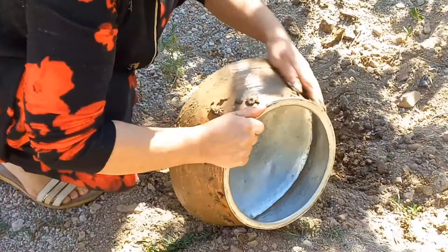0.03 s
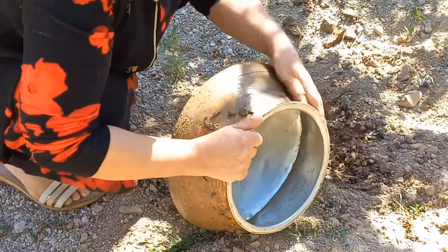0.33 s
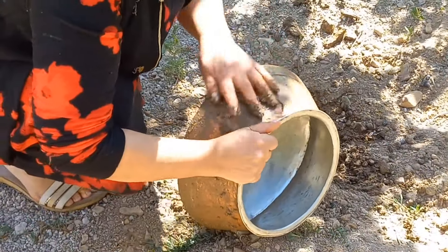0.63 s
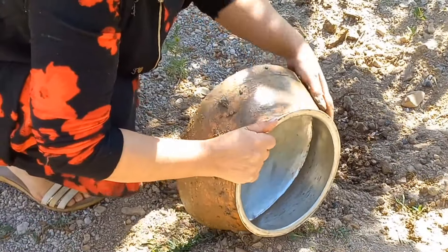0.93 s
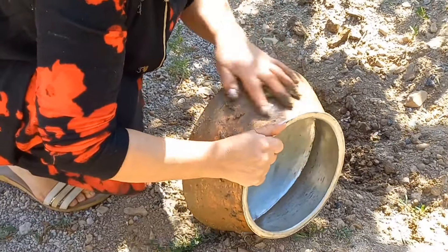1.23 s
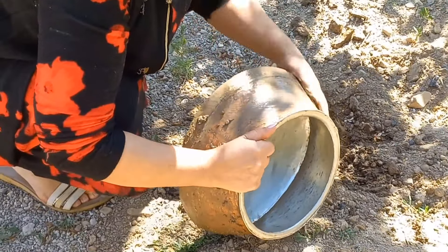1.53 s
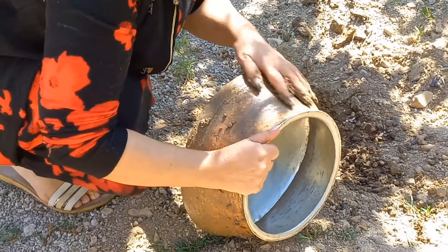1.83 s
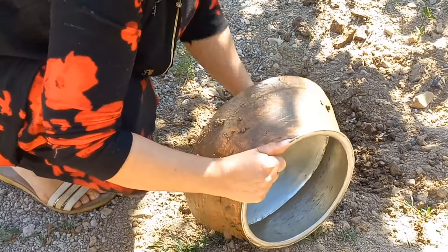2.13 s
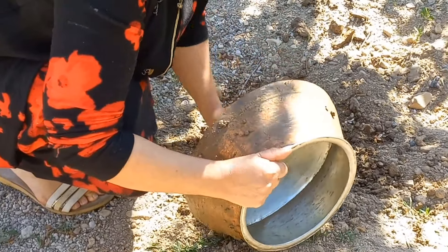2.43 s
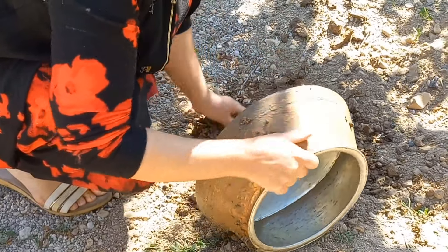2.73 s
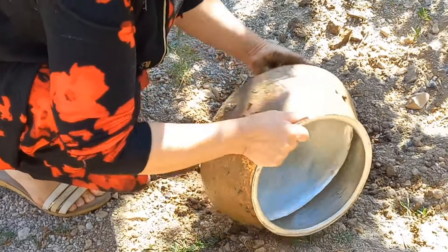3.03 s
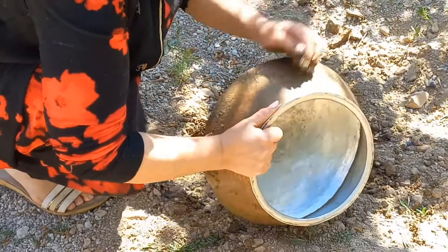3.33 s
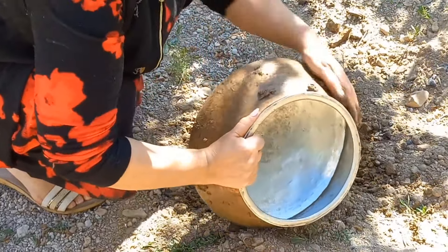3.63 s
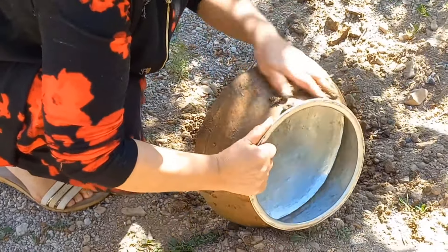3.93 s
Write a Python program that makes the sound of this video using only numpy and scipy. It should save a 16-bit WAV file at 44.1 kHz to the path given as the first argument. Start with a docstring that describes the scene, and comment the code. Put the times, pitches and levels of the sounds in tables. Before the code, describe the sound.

A hand scrubs a metal pot with dry soil in gritty, faintly ringing strokes.

```python
"""A hand scours the outside of a metal pot with dry soil, outdoors, in back-and-forth strokes.
Stick-slip friction of the grit makes a dense train of impulses, heard directly as a hiss and
through the wall's modes as a ring. Halfway the hand scoops fresh soil from the ground, then scrubs
on. Puffs of breeze thud and rumble on the close microphone, over a faint hush and two far chirps."""
import sys
import numpy as np
from scipy import signal
from scipy.io import wavfile

SR = 44100
rng = np.random.default_rng(int(sys.argv[2]) if len(sys.argv) > 2 else 0)


def master_out(mix):
    """Clip the mix to full scale and print it as 16-bit PCM to the path in sys.argv[1]."""
    frames = np.transpose(np.atleast_2d(mix))
    ceiling = np.clip(frames, -1, 1)
    pcm = np.round(ceiling * 32767).astype(np.int16)
    wavfile.write(sys.argv[1], SR, pcm)


N = 176400
T = np.arange(N) / SR

# relative spectral density of the outdoor hush: frequency_hz, level_db
AIR_SPECTRUM = [(30, -14.5), (150, 6.5), (500, -0.5), (1500, -8), (4000, -9), (7500, -8.5), (10000, -20),
                (15000, -13)]
# relative spectral density of the wind rumble: frequency_hz, level_db
RUMBLE_SPECTRUM = [(25, -22), (55, 3.5), (95, 6), (170, -5), (280, -11.5), (500, -40.5), (900, -50)]
# envelope of the rumble: time_s, level_db
RUMBLE_ENVELOPE = [(0, -48.5), (.14, -64), (.22, -71.5), (.55, -67), (.65, -49), (.78, -77.5),
                   (2.05, -87.5), (2.28, -55.5), (2.55, -64), (2.75, -56.5), (2.86, -46), (3.1, -55),
                   (3.28, -56.5), (3.5, -52), (3.75, -46.5), (4, -44.5)]
# distant chirps: start_s, length_s, level_db
FAR_CHIRPS = [(2.56, 0.074, -74), (2.736, .12, -75)]
# breeze striking the microphone: start_s, peak_db, pitch_hz, relative_puff_db, left_minus_right_db
WIND_THUDS = [(.005, -49, 112, -19, 1), (0.061, -52, 235, -9, -2), (0.094, -44.5, 265, -10.5, -2),
              (0.136, -47, 243, -5, -2), (0.432, -43, 79, -25, -2), (0.593, -46.5, 122, -18, -27),
              (0.624, -44, 74.6, -28, -8), (0.66, -68, 137, -18, -9), (1.161, -53, 87, -16, 4),
              (2.141, -47, 89, -24, 3), (2.297, -40.5, 80, -23, -6), (2.321, -45, 110, -25, 1),
              (2.624, -44, 97, -46, -3), (2.68, -41, 104, -31, -24.5), (2.763, -53, 258, -3, 3),
              (2.788, -40, 214, -11, -10), (2.808, -39.5, 182, -8.5, -11), (2.838, -26, 180, -15.5, -1.5),
              (2.848, -23.5, 101.6, -15, 0), (2.921, -41, 113, -28, 16), (3.003, -36, 95, -26, 0),
              (3.207, -42.5, 111, -34, -13), (3.332, -37, 84.6, -40, -3.5), (3.357, -36.5, 75.4, -20.5, -2),
              (3.532, -36.5, 105, -33, -1), (3.552, -38.5, 109, -25, -7), (3.626, -37, 119, -20, -27),
              (3.66, -34, 140, -18.5, -3), (3.724, -30.5, 160, -9.5, -9), (3.748, -42.5, 162, -2, 3),
              (3.808, -30.5, 97, -11, -1), (3.892, -36, 127, -10, -13), (3.916, -36.5, 105, -15.5, -8),
              (3.947, -24, 112, -20.5, -2.5)]

# sweeps through loose soil: start_s, end_s, rise_s, fall_s, level_db, swell_db, treble_db
SOIL_SWEEPS = [(2.20, 2.79, 0.22, 0.4, -67.5, 9, 0.5), (2.49, 2.58, 0.019, 0.065, -63, -2, -7.5),
               (2.81, 2.9, 0.044, 0.045, -62.5, 9, -5.5), (2.87, 3.06, 0.059, 0.055, -71, 9, -1),
               (2.98, 3.19, 0.11, 0.17, -57, -6, -4.5)]
# relative spectral density of raked soil: frequency_hz, level_db
SOIL_SPECTRUM = [(300, -14), (800, -29), (1300, -5.5), (2000, 1.5), (2800, -3), (4000, 5), (6000, -2.5),
                 (7400, -5.5), (9000, -6.5), (15000, -8)]
# clods crumbling: start_s, peak_db, t60_s
CLOD_BREAKS = [(2.142, -55, 0.051), (2.188, -56.5, 0.2), (2.486, -55, 0.11), (2.501, -62, 0.089)]
# gathering the handful: start_s, end_s, rise_s, fall_s, level_db, swell_db
GATHER_STROKES = [(2.93, 3.26, 0.18, 0.27, -66, -8)]
# resonances of the cupped handful: pitch_hz, level_db, t60_s
HOLLOW_MODES = [(1250, -7, 0.042), (1850, 3, 0.019), (3800, -19.5, 0.014)]

# strokes on the pot: start_s, end_s, rise_s, fall_s, level_db, swell_db, treble_db, ring_db
POT_STROKES = [(-.06, .07, .04, 0.063, -33.5, -4, -2.5, -6.5), (.02, .27, 0.048, 0.17, -35.5, 9.5, 2, -1),
               (.24, .62, 0.057, 0.044, -44.5, -4, 3.5, 1.5), (.56, .715, 0.043, 0.092, -39.5, -5, 1.5, -2),
               (.595, .66, 0.035, 0.022, -38.5, 2, -4, 0), (.70, .87, 0.058, 0.078, -33, 6.5, 0, -5),
               (.79, 1.02, 0.052, .13, -34, -1.5, -1, -2.5),
               (1.01, 1.24, 0.072, 0.022, -43, -3.5, 2.5, 1.5),
               (1.18, 1.40, 0.031, 0.092, -38, 7, -1, -7.5), (1.385, 1.51, 0.033, 0.08, -45.5, 13, 9, 4),
               (1.49, 1.68, 0.085, 0.096, -37.5, -9, 0.5, -8.5),
               (1.665, 2.04, 0.078, 0.091, -41.5, -3, 2.5, -3.5),
               (1.96, 2.10, 0.021, 0.13, -53, -3, 22, 14.5),
               (2.03, 2.32, 0.036, 0.069, -66.5, -5.5, 5.5, 5.5),
               (3.345, 3.42, .025, 0.037, -70, 10.5, 14.5, 11.5),
               (3.41, 3.555, 0.097, 0.092, -44.5, -6.5, 4, 3), (3.55, 3.85, 0.16, 0.11, -35, -4.5, 2, 3),
               (3.82, 4.08, 0.077, .06, -38.5, 0, 0.5, 1.5)]
# light contact through the turns: start_s, end_s, rise_s, fall_s, level_db, swell_db, treble_db, ring_db
PALM_CONTACTS = [(-.1, 2.1, .05, .08, -55, -1.5, 3.5, -1), (3.49, 4.5, 0.13, .05, -54.5, 2.5, 6, 12)]
# packed grit juddering: centre_s, half_length_s, level_db, pitch_hz
GRIT_JUDDERS = [(0.166, .03, -42, 2140), (0.573, 0.014, -44, 3000), (0.619, 0.015, -37.5, 2380),
                (0.843, 0.016, -44, 2200), (0.87, .03, -40.5, 2950), (1.313, 0.035, -44, 2940),
                (1.565, 0.022, -49, 2370)]
# relative spectral density of grit under the palm: frequency_hz, level_db
GRIT_SPECTRUM = [(300, -26.5), (620, -24.5), (900, -26.5), (1120, -32), (1400, -5.5), (1750, -5),
                 (2250, 3.5), (3200, 2), (4500, 1), (6000, -5), (8500, -14), (11500, -10.5), (15500, -13)]
# stereo width of the scraping: frequency_hz, side_minus_mid_db
SCRAPE_WIDTH = [(300, -4), (1000, -13), (2200, -12.5), (4500, -8), (8000, -7.5), (12000, -7)]
# wall modes, damped by the hands: pitch_hz, level_db, t60_s
WALL_MODES = [(775, -31.5, 0.084), (974, -25, 0.15), (1120, -42, 0.082), (1216.5, -19, 0.063),
              (1318, -23.5, 0.27), (1367, -22, 0.13), (1478, -20.5, 0.18), (1703, -18.5, 0.03),
              (1846, -20, 0.14), (2465, -50, 0.14), (2980, -26.5, 0.15), (3570, -21.5, 0.027),
              (3900, -19, 0.055), (4630, -22.5, 0.085)]

AIR_DB, AIR_SIDE_DB, RUMBLE_SIDE_DB, RUMBLE_PAN_DB = -73, -1.5, -2, -5.5
CHIRP_FROM_HZ, CHIRP_TO_HZ, CHIRP_ROUGH_HZ = 4300, 3600, 90
THUD_RISE_S, PUFF_LOW_HZ, PUFF_HIGH_HZ, PORT_LAG_RAD = 0.0089, 157, 389, 1.6
GRIT_DB, GRAINS_PER_S, GRAIN_SPREAD_DB, JUDDER_T60_S = -2, 14000, 1.5, 0.011
CATCH_DB, CATCH_HZ, PRESSURE_DB, PRESSURE_HZ, PATCHY_DB = 1.23, 135, 0.4, 19, 2
SPEED_EXPONENT = 1.72
TREBLE_FROM_HZ, TREBLE_FULL_HZ = 2550, 7700
ECHO_DELAY_S, ECHO_SWING, ECHO_DRIFT_HZ, ECHO_DB = .0021, 0.119, 1.42, -6
MODE_WANDER_DB, RING_SIDE_DB = 5, -12.5
SHIMMER_DB, SHIMMER_T60_S, SHIMMER_LOW_HZ, SHIMMER_HIGH_HZ = -9, 0.065, 1895, 5094
CUTOFF_HZ = 15850


def from_db(db):
    """Decibels to amplitude ratio."""
    return 10 ** (np.asarray(db) / 20)


def unit_rms(x):
    """Normalisation to unit mean power."""
    return x / np.sqrt(np.mean(x ** 2) + 1e-20)


def at_hz(points, hz):
    """Interpolation along a logarithmic frequency axis."""
    frequencies, levels = np.transpose(points)
    return np.interp(np.log(hz), np.log(frequencies), levels)


def drift(hz):
    """Low-passed Gaussian noise: a smooth random fluctuation of unit spread."""
    pole = np.exp(-40 * np.pi * hz / SR)   # runs at SR / 20
    slow = signal.lfilter([1], [1, -2 * pole, pole * pole], rng.standard_normal(N // 20 + 2002))[2000:]
    return np.interp(np.arange(N) / 20, np.arange(len(slow)), unit_rms(slow))


def band(x, low_hz, high_hz):
    """Maximally flat band-pass filtering."""
    return signal.sosfilt(signal.butter(2, [low_hz, high_hz], "band", fs=SR, output="sos"), x + 1e-18)


def resonator(x, hz, t60):
    """A damped harmonic oscillator with unit gain at resonance."""
    r = np.exp(-np.log(1000) / (t60 * SR))
    return signal.lfilter([1 - r, 0, r - 1], [1, -2 * r * np.cos(2 * np.pi * hz / SR), r * r], x + 1e-18)


def stereo(pair, side_db):
    """Sum and difference turn mid and side into left and right, conserving power."""
    side = from_db(side_db)
    return np.array([pair[0] + side * pair[1], pair[0] - side * pair[1]]) / np.sqrt(1 + side ** 2)


def pan(db):
    """A left-right level difference at constant power."""
    return unit_rms(from_db([[db / 2], [-db / 2]]))


def coloured(sources, spectrum, width, patchy_db, treble_db=0):
    """Spectral shaping in independently flickering third octaves; power near 1 before the treble tilt."""
    edges = 20 * 2 ** (np.arange(30) / 3)
    out, power = 0, 0
    for k, (low, high) in enumerate(zip(edges, edges[1:])):
        hz = np.sqrt(low * high)
        if high < spectrum[0][0] or low > spectrum[-1][0]:
            continue
        part = stereo(band(sources[k % 2], low, high), at_hz(width, hz))   # neighbours are uncorrelated
        part *= from_db(at_hz(spectrum, hz) + patchy_db * drift(PRESSURE_HZ))
        power += np.mean(part ** 2)
        tilt = np.clip(np.log(hz / TREBLE_FROM_HZ) / np.log(TREBLE_FULL_HZ / TREBLE_FROM_HZ), 0, 1)
        out += part * from_db(treble_db * tilt)
    return out / np.sqrt(power)


def air():
    """Turbulent pressure at the microphone rumbles over a faint broadband hush."""
    rumble = coloured(rng.standard_normal((2, 2, N)), RUMBLE_SPECTRUM, [(100, RUMBLE_SIDE_DB)],
                      patchy_db=0.5)
    hush = coloured(rng.standard_normal((2, 2, N)), AIR_SPECTRUM, [(100, AIR_SIDE_DB)], patchy_db=2.2)
    envelope = from_db(np.interp(T, *np.transpose(RUMBLE_ENVELOPE)))
    return rumble * pan(RUMBLE_PAN_DB) * envelope + from_db(AIR_DB) * hush


def chirps():
    """Random frequency modulation roughens thin, falling tones."""
    out = 0
    for start, length, db in FAR_CHIRPS:
        progress = np.clip((T - start) / length, 0, 1)
        hz = CHIRP_FROM_HZ + (CHIRP_TO_HZ - CHIRP_FROM_HZ) * progress + CHIRP_ROUGH_HZ * drift(200)
        out += from_db(db) * np.sin(np.pi * progress) * np.sin(2 * np.pi * np.cumsum(hz) / SR)
    return out


def wind_thuds():
    """Pressure pulses: a few low cycles reach the two microphone ports out of phase, with a dull puff."""
    out = np.zeros((2, N))
    noise = band(rng.standard_normal((2, N)), PUFF_LOW_HZ, PUFF_HIGH_HZ)
    puff = stereo(unit_rms(band(noise, 40, 600)), RUMBLE_SIDE_DB)
    for start, db, hz, puff_db, pan_db in WIND_THUDS:
        age = np.maximum(T - start, 0)
        envelope = (age / THUD_RISE_S * np.exp(1 - np.minimum(age / THUD_RISE_S, 20))) ** 2
        cycles = np.sin(2 * np.pi * hz * age + np.array([[-.5], [.5]]) * PORT_LAG_RAD)
        out += from_db(db) * pan(pan_db) * envelope * (cycles + from_db(puff_db) * puff)
    return out


def grains(per_s, spread_db):
    """Shot noise: two mid-side pairs of random impulses that surge as grit catches and slips."""
    shape = (2, 2, N)
    sizes = from_db(spread_db * np.minimum(rng.exponential(1, shape), 5)) * rng.choice([-1, 1], shape)
    slips = rng.random(shape) < per_s / SR
    grip = from_db(CATCH_DB * drift(CATCH_HZ) + PRESSURE_DB * drift(PRESSURE_HZ))
    return unit_rms(sizes * slips * grip)


def motion(strokes):
    """Friction noise follows a power law of speed; returns gain and the power-weighted tone columns."""
    powers = []
    for start, end, rise, fall, db, swell_db, *_ in strokes:
        speeding_up = np.sin(np.pi / 2 * np.clip((T - start) / rise, 0, 1))
        slowing_down = np.sin(np.pi / 2 * np.clip((end - T) / fall, 0, 1))
        from_centre = np.clip((T - (start + end) / 2) / (end - start), -.5, .5)
        amplitude = (speeding_up * slowing_down) ** SPEED_EXPONENT * from_db(db + swell_db * from_centre)
        powers.append(amplitude ** 2)
    total = np.sum(powers, axis=0) + 1e-16
    tone_columns = np.array(strokes)[:, 6:].T
    return np.sqrt(total), tone_columns @ np.array(powers) / total


def scooping():
    """Granular friction: fingers rake loose soil, and clods break in exponentially decaying bursts."""
    gain, (treble_db,) = motion(SOIL_SWEEPS)
    for start, db, t60 in CLOD_BREAKS:
        gain += (T >= start) * from_db(db) * np.exp(-np.log(1000) * np.abs(T - start) / t60)
    soil = grains(per_s=11000, spread_db=3.0)
    return gain * coloured(soil, SOIL_SPECTRUM, SCRAPE_WIDTH, patchy_db=1.0, treble_db=treble_db)


def gathering():
    """Resonance gives a hollow rasp to soil dragged together in the cupped hand."""
    gain, _ = motion(GATHER_STROKES)
    soil = grains(per_s=3000, spread_db=2)[0]
    rasp = sum(from_db(db) * unit_rms(resonator(soil, hz, t60)) for hz, db, t60 in HOLLOW_MODES)
    return gain * stereo(rasp, RING_SIDE_DB)


def judders():
    """Stick-slip of packed grit concentrates energy in brief narrow-band surges."""
    grit = grains(GRAINS_PER_S, GRAIN_SPREAD_DB)[0]
    out = 0
    for centre, half_length, db, hz in GRIT_JUDDERS:
        envelope = from_db(db) * np.exp(-((T - centre) / half_length) ** 2)
        out += envelope * unit_rms(resonator(grit, hz, JUDDER_T60_S))
    return stereo(out, RING_SIDE_DB)


def with_reflection(direct):
    """Comb filtering: interference with a close reflection cuts notches that shift as the hand moves."""
    delay = ECHO_DELAY_S * np.exp(ECHO_SWING * drift(ECHO_DRIFT_HZ))
    echo = np.array([np.interp(T - delay, T, channel) for channel in direct])
    return (direct + from_db(ECHO_DB) * echo) / np.hypot(1, from_db(ECHO_DB))


def pot_wall(drive):
    """Modal superposition: main modes wander in strength while crowded upper modes shimmer."""
    modes = 0
    for hz, db, t60 in WALL_MODES:
        mode = resonator(band(drive, hz / 1.15, hz * 1.15), hz, t60)
        mode *= np.sqrt(t60 * SR / np.log(1000))   # equal noise power at any damping
        modes += mode * from_db(db + MODE_WANDER_DB * np.tanh(drift(2.2)))
    pitches = np.geomspace(SHIMMER_LOW_HZ, SHIMMER_HIGH_HZ, num=40) * rng.uniform(.985, 1.015, size=40)
    shimmer = sum(resonator(drive, hz, SHIMMER_T60_S) * rng.choice([-1, 1]) for hz in pitches)
    shimmer *= np.sqrt(SHIMMER_T60_S * SR / np.log(1000) / len(pitches))
    return stereo(modes + from_db(SHIMMER_DB) * shimmer, RING_SIDE_DB)


def scouring():
    """Sliding friction: grit on metal radiates a hiss and forces the wall into vibration."""
    gain, (treble_db, ring_db) = motion(POT_STROKES + PALM_CONTACTS)
    grit = grains(GRAINS_PER_S, GRAIN_SPREAD_DB)
    hiss = with_reflection(coloured(grit, GRIT_SPECTRUM, SCRAPE_WIDTH, PATCHY_DB, treble_db))
    drive = grains(GRAINS_PER_S, GRAIN_SPREAD_DB)[0] * gain * from_db(ring_db)
    return gain * from_db(GRIT_DB) * hiss + pot_wall(drive)


def scene():
    """Linear superposition of pot, ground and air."""
    return scouring() + judders() + scooping() + gathering() + chirps() + wind_thuds() + air()


def record(dry):
    """Band limiting: a steep elliptic low-pass removes the highest treble."""
    return signal.sosfilt(signal.ellip(16, .1, 70, CUTOFF_HZ, fs=SR, output="sos"), dry)


dry = scene()
out = record(dry)
master_out(out)
```